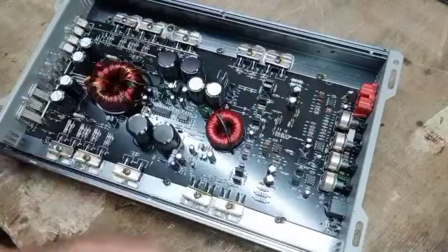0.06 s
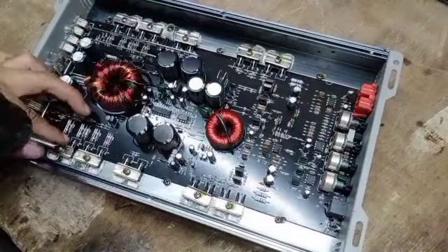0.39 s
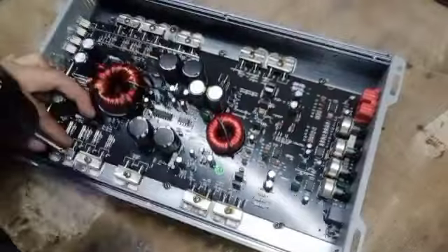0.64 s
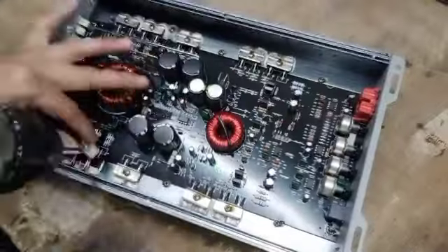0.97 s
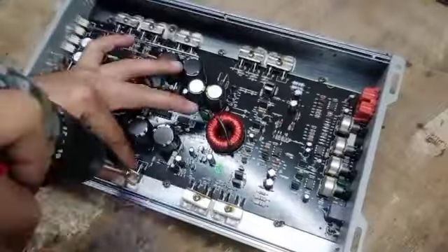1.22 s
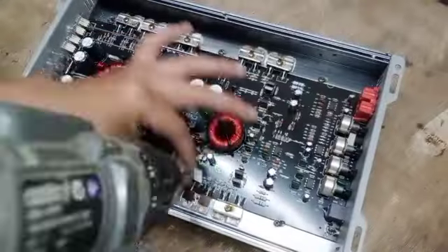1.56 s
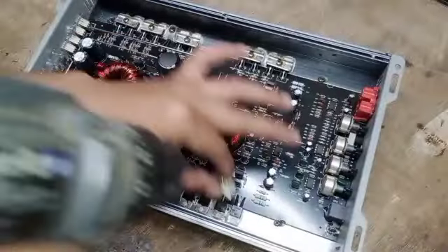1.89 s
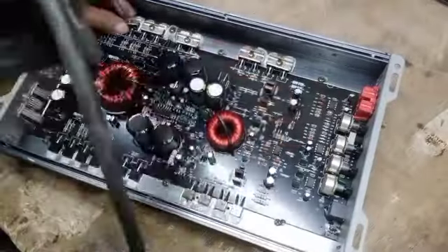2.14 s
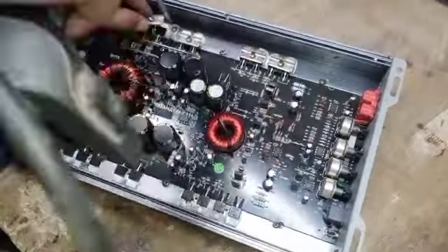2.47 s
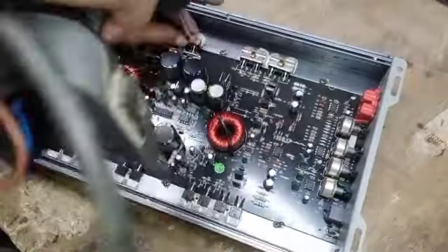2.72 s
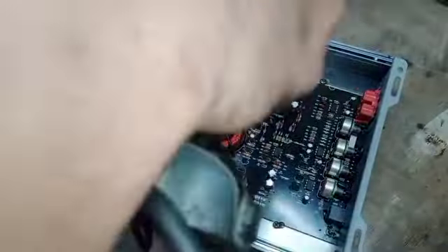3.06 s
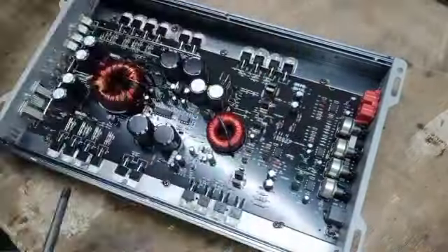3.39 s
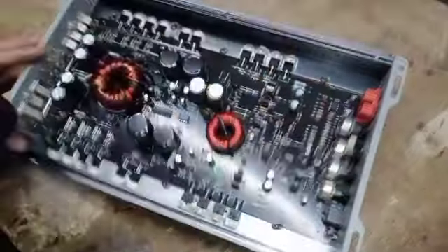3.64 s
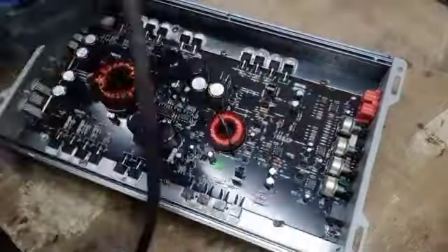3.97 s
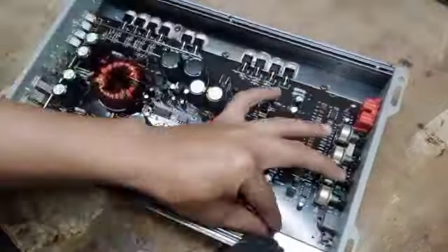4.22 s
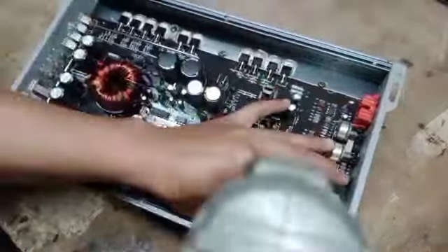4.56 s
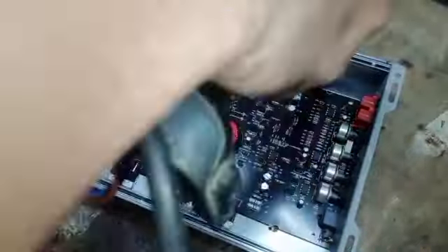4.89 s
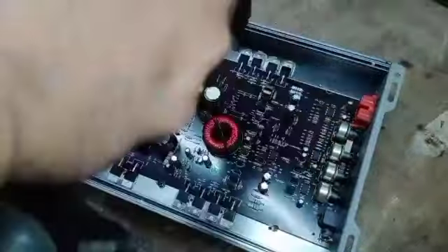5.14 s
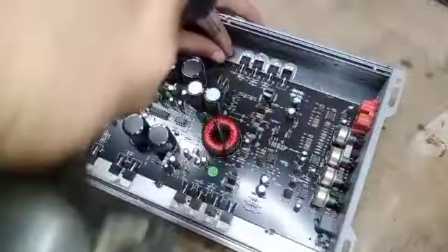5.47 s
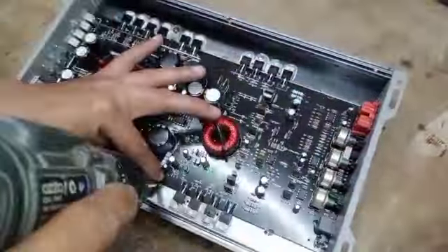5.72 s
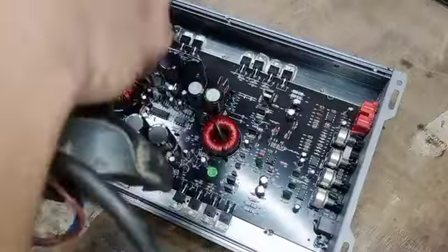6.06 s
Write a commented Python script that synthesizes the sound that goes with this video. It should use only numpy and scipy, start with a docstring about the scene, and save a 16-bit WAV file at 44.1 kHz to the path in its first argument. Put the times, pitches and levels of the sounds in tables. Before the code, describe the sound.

Close to the microphone, a power screwdriver fires in a rapid string of brief, raspy bursts, each fading slightly as a screw sinks into a metal case. Bright ticks, short ringing knocks and dull workbench thuds fall in and between the bursts as the bit moves to the next screw. Later the bursts come a bit less regularly, with a few faint squeaky rubs. Soft handling rustle lies underneath, in a quiet room without echo.

```python
"""At a workbench, a cordless driver runs screws into an aluminium amplifier case in rapid succession.
Each run is a short gritty whirr: gear teeth and thread ring the gearbox, chuck and case, over a motor
hum that rises and sags. Bit and tool knock on the case, thud into the bench and rub with a brief pitch.
Light metal ticks and snaps of the bit into the screw are bright, each with a brief narrow band of hiss
near 14 kHz. Hands rustle over a faint room tone."""
import sys
import numpy as np
from scipy import signal
from scipy.fft import rfft, irfft, next_fast_len
from scipy.io import wavfile

SR = 44100
rng = np.random.default_rng(int(sys.argv[2]) if len(sys.argv) > 2 else 0)


def int16_out(signal):
    """Quantize to a 16-bit WAV file."""
    q = np.round(np.clip(np.atleast_2d(signal).T, -1, 1) * 32767)
    wavfile.write(sys.argv[1], SR, q.astype(np.int16))


N = 269615
TIME_S = np.arange(N) / SR

# Table levels are relative; the functions add gain.
# spectra: (frequency [Hz], density [dB])
ROOM_SPECTRUM = [(18, -43), (30, -23), (98, 2), (145, -0.5), (210, -13.5), (486, -10), (702, -17),
                 (1320, -21), (1810, -20), (13700, -38.5), (16000, -25)]
RUSTLE_SPECTRUM = [(30, 7), (115, 15), (250, 2.5), (550, 4), (1100, -7.5), (2400, -14), (4000, -13.5),
                   (7400, -18.5), (9200, -47), (14000, -31), (16000, -27)]
TICK_SPECTRUM = [(200, -12.5), (1200, -7), (2800, 6.5), (4200, 5.5), (5200, -2.5), (7400, 0.5), (9200, -22),
                 (11500, -16), (14000, -40), (16000, 5)]
THUD_SPECTRUM = [(30, -7), (100, 4.5), (200, -1), (400, -7), (700, -10.5), (1500, -54.5)]
CRACK_SPECTRUM = [(300, -7.5), (1000, 6.5), (2200, 11.5), (3600, 1), (5000, -7), (7300, -8), (9000, -31),
                  (14000, -28), (16000, -23)]
WHIRR_SPECTRUM = [(40, -7.5), (130, 0), (330, -9), (520, -6), (850, -3.5), (1800, -9), (3300, 3.5),
                  (4900, -5.5), (7400, -2), (9000, -16.5), (10600, -12), (11400, -15.5), (14100, -2),
                  (15600, -13.5)]
# case modes: (frequency [Hz], level [dB], T60 [s])
CASE_MODES = [(658, -4, 0.02), (950, 7, 0.021), (1160, -8.5, 0.024), (1390, 4.5, 0.024), (1767, -9, 0.04),
              (2330, 0, 0.022), (2590, -21, 0.021)]
# gearbox and chuck resonances: (frequency [Hz], width [Hz], level [dB])
GEARBOX_MODES = [(880, 200, -2), (2395, 137, 3), (2770, 160, -2), (3620, 210, 1), (4310, 280, 1),
                 (5460, 140, -3.5), (6600, 870, -13)]
# hand and sleeve activity: (time [s], level [dB])
HANDLING_CURVE = [(0.5, -63), (1.3, -78), (2.6, -65.5), (3.0, -70.5), (4.2, -66.5), (4.8, -63.5),
                  (6.1, -62)]
# grip shifts: (centre [s], length [s], level [dB])
GRIP_SHIFTS = [(0.524, 0.1, -37.5), (1.046, 0.04, -55.5), (4.908, 0.044, -46), (5.494, 0.073, -53),
               (5.735, 0.085, -53)]
# bit or tool sliding: (start [s], length [s], pitch [Hz], level [dB])
TOOL_RUBS = [(1.561, 0.013, 385, -55), (2.957, 0.05, 1400, -51), (3.417, 0.07, 367, -58.5),
             (3.505, 0.046, 383, -60), (4.75, 0.092, 835, -56.5), (4.773, 0.056, 1230, -52),
             (5.238, 0.04, 994, -45), (5.681, 0.097, 2470, -55), (5.683, 0.16, 1102, -45)]
# light metal ticks, and bright snaps of the bit as a run starts: (time [s], scratch [dB], hiss [dB])
TICKS_AND_SNAPS = [(0.5623, -39, -59), (0.769, -44, -82), (0.993, -48.5, -64), (1.295, -42.5, -56),
                   (1.592, -46, -49), (1.922, -42, -62), (2.187, -52, -53.5), (2.527, -38.5, -80),
                   (2.6, -39, -51), (2.768, -41.5, -44.5), (3.001, -32.5, -51), (3.166, -40, -55.5),
                   (3.275, -29.5, -57), (3.409, -45.5, -49), (3.482, -51, -68.5), (3.597, -31.5, -49),
                   (3.8197, -47, -53.5), (3.907, -32, -52), (4.31, -48.5, -72), (4.677, -43, -60),
                   (5.309, -35, -43), (5.5482, -44.5, -77)]
# blows on the case: (time [s], ring [dB], struck spot pitch [Hz], bench thud [dB])
CASE_KNOCKS = [(0.519, -41.5, 1300, -51.5), (0.794, -39.5, 1040, -61), (1.013, -31, 1080, -67),
               (1.1, -62, 1360, -64), (1.316, -29.5, 927, -50.5), (1.354, -41.5, 1440, -53.5),
               (1.384, -47.5, 1270, -54.5), (1.61, -60, 2320, -46.5), (1.651, -44.5, 1600, -47.5),
               (1.691, -39.5, 1590, -46.5), (1.987, -56.5, 1180, -51.5), (2.032, -50, 2480, -41.5),
               (2.218, -40.5, 2160, -47), (2.492, -43, 1730, -53.5), (2.555, -43, 1530, -52),
               (2.783, -49, 2540, -51.5), (2.99, -48.5, 1350, -49), (3.053, -48, 2700, -58),
               (3.096, -44, 2400, -53), (3.122, -50.5, 1820, -51), (3.148, -67, 2250, -49),
               (3.276, -45, 1004, -60), (3.57, -43.5, 1390, -49), (3.78, -55.5, 2210, -57),
               (3.861, -50.5, 1420, -47), (3.99, -39.5, 920, -40.5), (4.139, -42, 1755, -49.5),
               (4.22, -49.5, 1400, -44), (4.386, -37, 1110, -32), (4.419, -73, 1100, -39.5),
               (4.465, -36, 1400, -37.5), (4.853, -57.5, 1395, -46.5), (5.196, -34, 1110, -53),
               (5.251, -49, 940, -57), (5.487, -45, 680, -48), (5.596, -33, 976, -55),
               (5.637, -42, 2120, -48), (6.027, -57.5, 1630, -55.5), (6.087, -50.5, 1660, -49)]
# driver runs: (start [s], spin-up [s], drive [s], run-down [s], level [dB], case ring [dB], bite [dB])
DRIVER_RUNS = [(0.57, 0.034, 0.097, 0.011, -36, -39.5, -59), (0.834, 0.026, 0.088, 0.0081, -36, -40.5, -40),
               (1.128, 0.017, 0.092, 0.011, -36, -42.5, -51), (1.414, 0.03, 0.074, 0.019, -35.3, -43, -56),
               (1.744, 0.017, 0.095, 0.014, -34.5, -44, -40.5),
               (2.017, 0.026, 0.091, 0.022, -35.5, -42, -45.5), (2.312, 0.035, 0.07, 0.12, -36, -46, -41),
               (2.594, 0.015, 0.092, 0.012, -35.5, -44, -45.5),
               (2.827, 0.023, 0.079, 0.017, -35, -45.5, -42.5), (3.169, 0.038, 0.07, 0.11, -35, -44.5, -47),
               (3.588, 0.03, 0.14, 0.029, -35.5, -39, -40.5), (3.901, 0.013, 0.1185, 0.084, -36, -38, -40),
               (4.346, 0.013, 0.058, 0.0055, -37.5, -41, -42), (4.434, 0.045, 0.13, 0.025, -34.5, -45, -58),
               (4.907, 0.045, 0.11, 0.015, -33.5, -46, -45), (5.280, 0.043, 0.12, 0.01, -35, -39, -39),
               (5.756, 0.034, 0.12, 0.0096, -35, -39.5, -55)]

CASE_HZ = 1390  # case mode that sings under the screw


def from_db(db):
    """Decibels to gain."""
    return 10 ** (np.asarray(db) / 20)


def rms_one(x):
    """Scale to unit rms."""
    return x / np.sqrt(np.mean(x ** 2) + 1e-20)


def add(out, time_s, sound):
    """Mix a sound in from time_s on."""
    at = max(int(time_s * SR), 0)
    out[at:at + len(sound)] += sound[:max(N - at, 0)]


def colour(x, spectrum):
    """Minimum-phase filter that follows a spectrum; rms 1."""
    size = next_fast_len(len(x) + 2048, True)
    size += size % 2
    hz, db = np.transpose(spectrum)
    grid_hz = np.maximum(np.arange(size // 2 + 1) * SR / size, 1)
    gain = from_db(np.interp(np.log(grid_hz), np.log(hz), db))
    cepstrum = irfft(np.log(gain))
    cepstrum[1:size // 2] *= 2
    cepstrum[size // 2 + 1:] = 0
    return rms_one(irfft(rfft(x, size) * np.exp(rfft(cepstrum)))[:len(x)])


def band(x, hz, width_hz):
    """One resonance, peak gain 1."""
    r = np.exp(-np.pi * width_hz / SR)
    feedback = [1, -2 * r * np.cos(2 * np.pi * hz / SR), r * r]
    return signal.lfilter(np.array([1, 0, -1]) * (1 - r * r) / 2, feedback, x)


def drift(rate_hz):
    """Random wander; rms 1."""
    knots = rng.standard_normal(N // 20)
    return rms_one(np.interp(TIME_S * rate_hz, np.arange(len(knots)), knots))


def grit(per_s, spread_db):
    """Dense tiny impacts of uneven size; rms 1."""
    sizes = from_db(spread_db * np.minimum(rng.exponential(1, N), 4))
    return rms_one((rng.random(N) < per_s / SR) * sizes * rng.choice([-1, 1], N))


def burst(rise_s, fall_s, tail_db, tail_s, size=4096):
    """Contact noise: quick swell, fast decay, faint tail."""
    t = np.arange(size) / SR
    swell = 1 - np.exp(-(t / rise_s) ** 2)
    decay = np.exp(-t / fall_s) + from_db(tail_db) * np.exp(-t / tail_s)
    return swell * decay * rng.standard_normal(size)


def brushes(per_s):
    """Envelope of random light touches, 20 ms each; rms 1."""
    touches = (rng.random(N) < per_s / SR) * rng.uniform(.3, 1, N)
    return rms_one(signal.oaconvolve(touches, np.hanning(SR // 50) ** 2, "same"))


def room_tone(level_db=-79, gap_s=(0.215, 0.478)):
    """Faint steady noise with one short gap."""
    heard = (TIME_S < gap_s[0]) | (TIME_S > gap_s[1])
    return from_db(level_db) * heard * colour(rng.standard_normal(N), ROOM_SPECTRUM)


def handling(gain_db=-6, rustle_db=-1, scratch_db=-3, case_db=1, width_hz=80, restless_db=4):
    """Hands and cable rub the case, more at grip shifts; light touches scratch it and wake its modes."""
    rustle = colour(grit(per_s=2600, spread_db=2), RUSTLE_SPECTRUM)
    scratches = brushes(per_s=26) * colour(rng.standard_normal(N), TICK_SPECTRUM)
    friction = rng.standard_normal(N)
    modes = rms_one(sum(from_db(db) * band(friction, hz, width_hz) * brushes(per_s=14)
                        for hz, db, _ in CASE_MODES))
    activity_db = np.interp(TIME_S, *np.transpose(HANDLING_CURVE), left=-200)
    touch = from_db(activity_db + restless_db * drift(25))
    for centre_s, length_s, db in GRIP_SHIFTS:
        add(touch, centre_s - length_s / 2, from_db(db) * np.hanning(int(length_s * SR)))
    texture = from_db(rustle_db) * rustle + from_db(scratch_db) * scratches + from_db(case_db) * modes
    return from_db(gain_db) * touch * texture


def rubs(gain_db=2, waver=0.072, rough_db=3):
    """A sliding contact sticks and slips at an unsteady pitch."""
    out, wander, rough = np.zeros(N), drift(350), from_db(rough_db * drift(250))
    for start_s, length_s, hz, db in TOOL_RUBS:
        on = (TIME_S > start_s) & (TIME_S < start_s + length_s)
        phase = 2 * np.pi * np.cumsum(hz * (1 + waver * wander[on])) / SR
        out[on] += from_db(db + gain_db) * np.hanning(on.sum()) * rough[on] * np.sin(phase)
    return out


def ticks(scratch_gain_db=-13, hiss_gain_db=-5, hiss_hz=14050, scatter_hz=130, width_hz=400):
    """Metal ticks and bit snaps: a bright scratch, each with a brief narrow band of hiss near 14 kHz."""
    out = np.zeros(N)
    for time_s, scratch_db, hiss_db in TICKS_AND_SNAPS:
        scratch = colour(burst(rise_s=0.0025, fall_s=0.0052, tail_db=-30, tail_s=0.01), TICK_SPECTRUM)
        hz = hiss_hz + rng.normal(0, scatter_hz)
        narrow = signal.butter(2, [hz - width_hz / 2, hz + width_hz / 2], "band", fs=SR, output="sos")
        hiss = signal.sosfilt(narrow, burst(rise_s=0.0026, fall_s=0.0047, tail_db=-29, tail_s=0.012))
        add(out, time_s, from_db(scratch_db + scratch_gain_db) * scratch)
        add(out, time_s, from_db(hiss_db + hiss_gain_db) * rms_one(hiss))
    return out


def case_ring(spot_hz, swell_s, spot_db=1, spot_t60_s=0.025, reach_oct=0.52, chatter_db=-15, size=4096):
    """A blow rings the struck spot and case modes near it in pitch; the loose board chatters; rms 1."""
    t = np.arange(size) / SR
    hz, mode_db, t60_s = np.transpose(CASE_MODES + [(spot_hz, spot_db, spot_t60_s)])[:, :, None]
    nearness = np.exp(-(np.log2(hz / spot_hz) / reach_oct) ** 2 / 2)
    phase = 2 * np.pi * (hz * t + rng.random(hz.shape))
    modes = nearness * np.sin(phase) * from_db(mode_db - 60 * t / t60_s)
    weights = from_db(rng.normal(0, 2, len(hz)))
    blow = weights @ modes * (1 - np.exp(-(t / swell_s) ** 3))
    bounces = burst(rise_s=0.0013, fall_s=0.0044, tail_db=-28, tail_s=0.012)
    chatter = signal.fftconvolve(bounces, blow)[:size]
    return rms_one(rms_one(blow) + from_db(chatter_db) * rms_one(chatter))


def knocks(gain_db=-9, drag_db=-12, swell_s=0.0023, bite_delay_s=0.013, bite_hz=1084,
           crack_base_db=-34, crack_db_per_db=0.57, crack_db_per_oct=7.5):
    """Tool blows and the bit biting into each screw: case ring, bench thud, contact crack."""
    out = np.zeros(N)
    bites = [(start_s + bite_delay_s, db, bite_hz, db) for start_s, *_, db in DRIVER_RUNS]
    for time_s, ring_db, spot_hz, thud_db in CASE_KNOCKS + bites:
        ring = from_db(ring_db + gain_db) * case_ring(spot_hz, swell_s)
        thud = colour(burst(swell_s, fall_s=0.0062, tail_db=-35, tail_s=0.028), THUD_SPECTRUM)
        crack = colour(burst(swell_s, fall_s=0.0042, tail_db=-49, tail_s=0.0091), CRACK_SPECTRUM)
        hardness_db = crack_db_per_oct * np.log2(spot_hz / CASE_HZ)  # higher spots are harder
        crack_db = crack_base_db + crack_db_per_db * ring_db + hardness_db
        add(out, time_s, ring + from_db(thud_db + gain_db) * thud + from_db(crack_db) * crack)
        # the bit drags just before it lands
        scrape = burst(rise_s=0.0017, fall_s=0.0011, tail_db=-54, tail_s=0.0052)[::-1]
        drag = from_db(crack_db + drag_db) * colour(scrape, CRACK_SPECTRUM)
        add(out, time_s + swell_s - len(drag) / SR, drag)
    return out


def motor(top_hz=210.9, level_db=-47.5, overtone_db=-13, rough_db=5.0, wobble=0.1,
          start_speed=0.4265, top_progress=0.55, end_progress=0.853):
    """Rotor unbalance hums; speed arches up, then down as the screw bites."""
    out, waver, rough = np.zeros(N), drift(120), from_db(rough_db * drift(130))
    for start_s, spin_up_s, drive_s, *_ in DRIVER_RUNS:
        progress = (TIME_S - start_s) / (spin_up_s + drive_s)
        on = (progress > 0) & (progress < end_progress)
        arch = 1 - (1 - start_speed) * (progress[on] / top_progress - 1) ** 2
        speed = arch * (1 + wobble * waver[on])
        phase = 2 * np.pi * np.cumsum(top_hz * speed) / SR
        hum = np.sin(phase) + from_db(overtone_db) * np.sin(2 * phase)
        fade = signal.windows.tukey(on.sum(), .3)
        out[on] += from_db(level_db) * fade * speed * rough[on] * hum
    return out


def gearbox(sway_db=5.0):
    """Tooth impacts ring the gearbox; each resonance swells and fades on its own; rms 1."""
    impacts = grit(per_s=5500, spread_db=2.5)
    return rms_one(sum((-1) ** k * band(impacts, hz, width_hz) * from_db(db + sway_db * drift(45))
                       for k, (hz, width_hz, db) in enumerate(GEARBOX_MODES)))


def bit_jangle(low_hz=1150, high_hz=5600, width_hz=55, count=20):
    """The bit rattles in the screw head; each bounce rings at one of many pitches; rms 1."""
    bounces, pitch_index = grit(per_s=700, spread_db=2.5), rng.integers(0, count, N)
    return rms_one(sum(band(bounces * (pitch_index == k) + 1e-18, hz, width_hz)
                       for k, hz in enumerate(np.geomspace(low_hz, high_hz, count))))


def driver(whirr_db=-1.45, rattle_db=-7, flutter_db=1.38, idle_db=-22, sag_db_per_s=47,
           ramp_s=0.0053, load_fade_s=0.15, case_gain_db=-1, ring_cutoff_hz=7000,
           chuck_hz=2980, chuck_db=-8, scatter_oct=0.12, whine_hz=3500, whine_db=-52):
    """Gear teeth and thread grind, ringing gearbox, chuck and case; the whirr sags as the screw sinks."""
    whirr = from_db(whirr_db) * colour(grit(per_s=14000, spread_db=4.0), WHIRR_SPECTRUM)
    rattle = from_db(rattle_db) * (gearbox() + bit_jangle())
    thread, teeth = grit(per_s=6100, spread_db=10), grit(per_s=6000, spread_db=4.5)
    hiss, rings = np.zeros(N), np.zeros(N)
    for start_s, spin_up_s, drive_s, run_down_s, run_db, ring_db, _ in DRIVER_RUNS:
        full_s, release_s, stop_s = start_s + np.cumsum([spin_up_s, drive_s, run_down_s])
        on = slice(int((start_s - ramp_s) * SR), int((stop_s + ramp_s) * SR))
        t, sag_db = TIME_S[on], -sag_db_per_s * drive_s
        corners_s = [start_s - ramp_s, start_s, full_s, release_s, stop_s, stop_s + ramp_s]
        corners_db = [2 * idle_db, idle_db, 0, sag_db, sag_db + idle_db, 2 * idle_db]
        effort = from_db(np.interp(t, corners_s, corners_db))
        # case and chuck sing most as the screw first takes load
        load = effort * np.exp(-np.maximum(t - full_s, 0) / load_fade_s)
        case = from_db(ring_db + case_gain_db) * rms_one(band(thread[on], CASE_HZ, width_hz=150))
        scattered_hz = chuck_hz * 2 ** (scatter_oct * rng.normal())
        chuck = from_db(run_db + chuck_db) * rms_one(band(teeth[on], scattered_hz, width_hz=260))
        # thin whine at the trigger squeeze
        squeeze = np.exp(-2 * ((t - start_s) / ramp_s) ** 2)
        whine = from_db(whine_db) * squeeze * rms_one(band(teeth[on], whine_hz, width_hz=82))
        hiss[on] += from_db(run_db) * effort * whirr[on]
        rings[on] += from_db(run_db) * effort * rattle[on] + load * (case + chuck) + whine
    lowpass = signal.butter(2, ring_cutoff_hz, fs=SR, output="sos")
    return (hiss + signal.sosfilt(lowpass, rings)) * from_db(flutter_db * drift(350))


def scene():
    """All sources close by; both channels alike."""
    mono = driver() + motor() + knocks() + ticks() + rubs() + handling() + room_tone()
    return np.array([mono, mono])


def record(dry):
    """Band limit: 25 Hz to 15.6 kHz."""
    rumble_cut = signal.butter(1, 25, "high", fs=SR, output="sos")
    top_cut = signal.ellip(10, .3, 70, 15600, fs=SR, output="sos")
    return signal.sosfilt(top_cut, signal.sosfilt(rumble_cut, dry))


dry = scene()
out = record(dry)
int16_out(out)
```